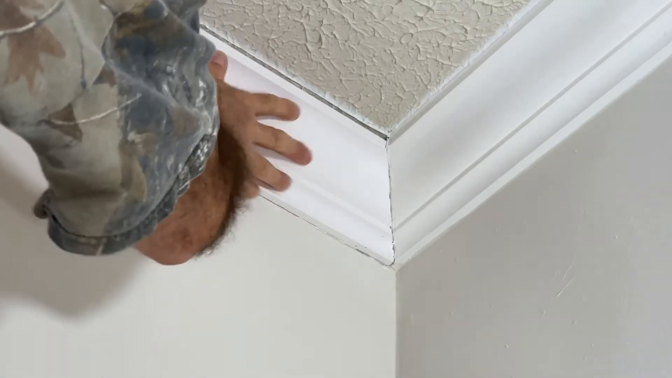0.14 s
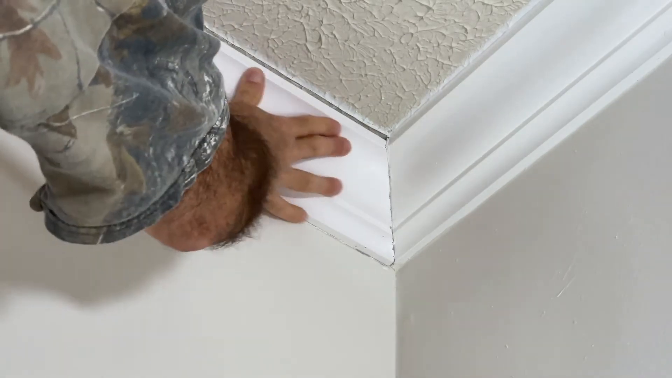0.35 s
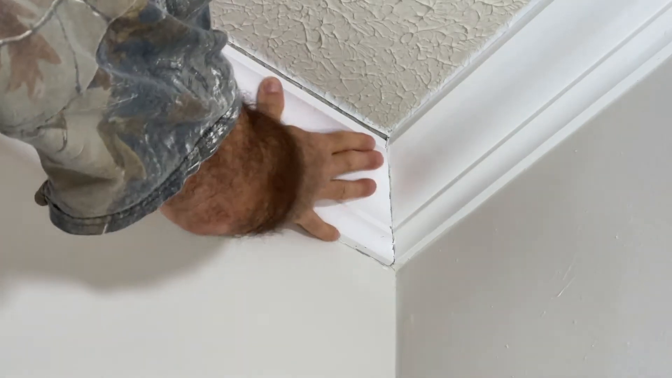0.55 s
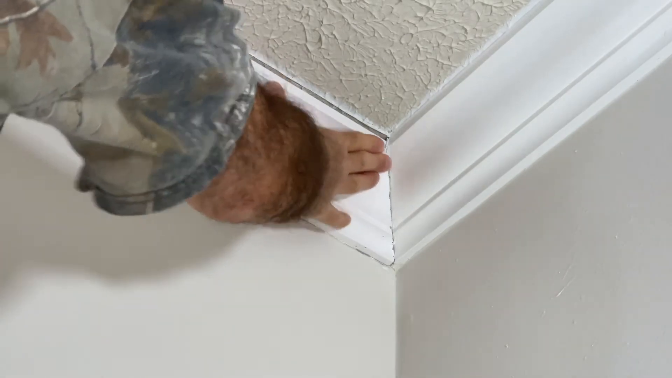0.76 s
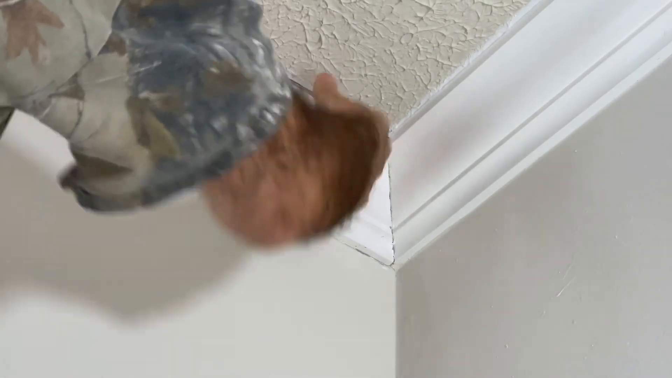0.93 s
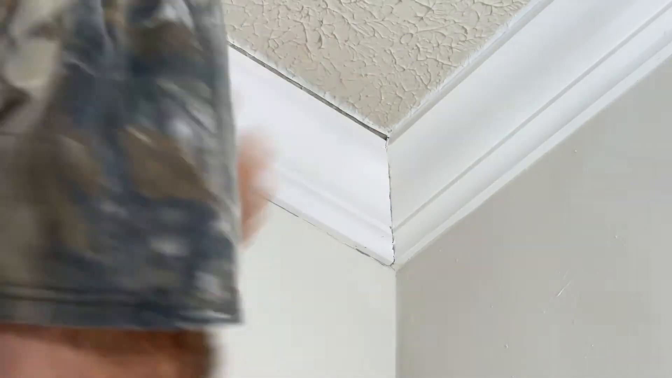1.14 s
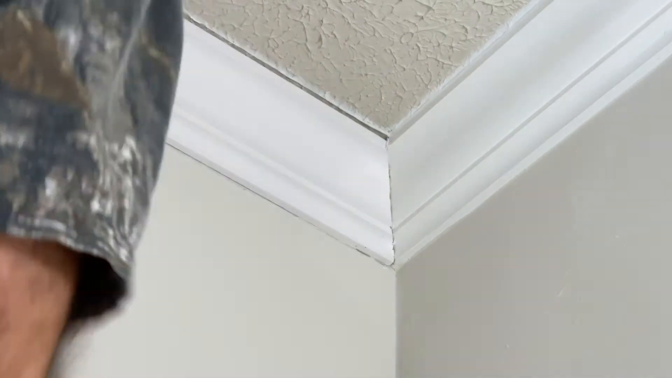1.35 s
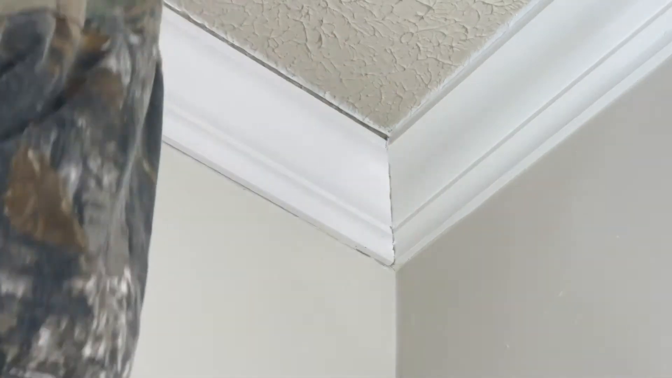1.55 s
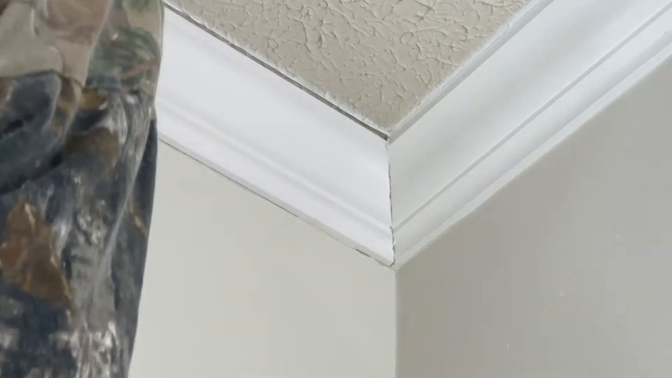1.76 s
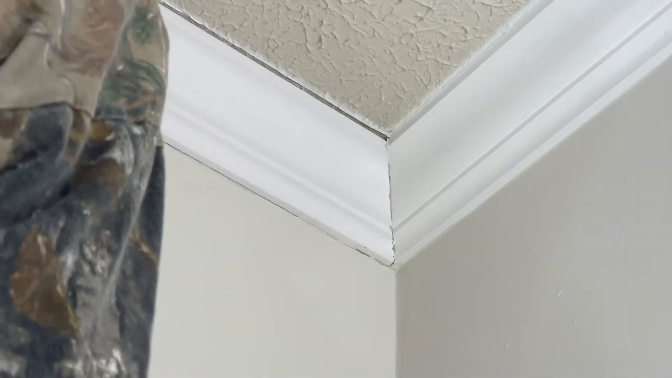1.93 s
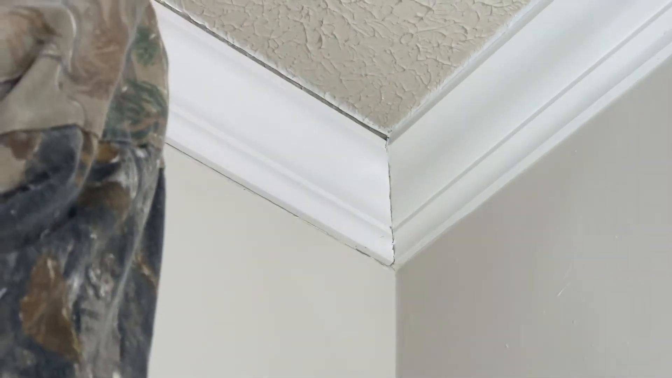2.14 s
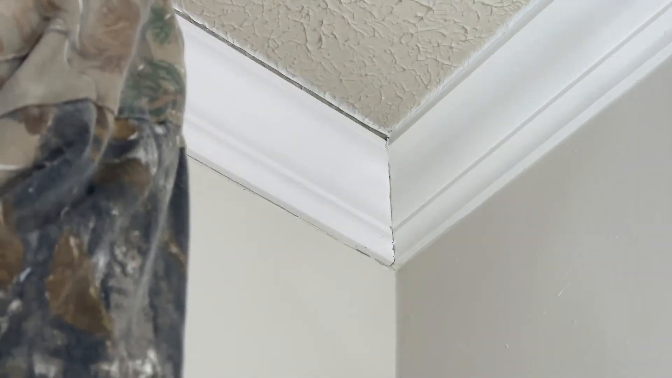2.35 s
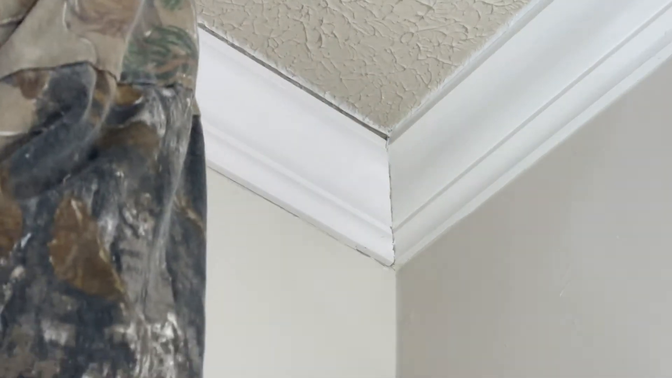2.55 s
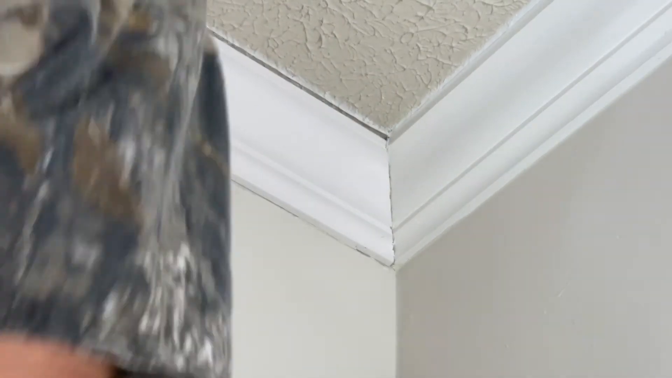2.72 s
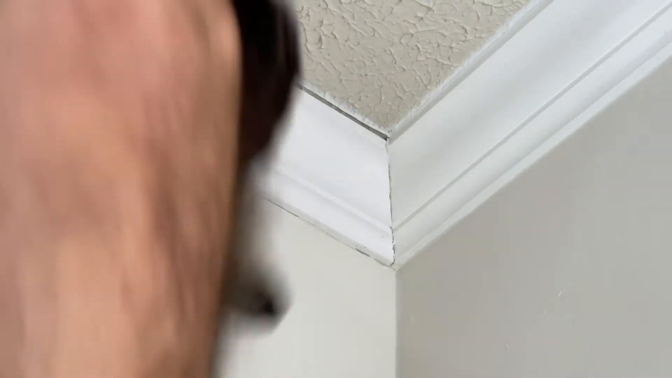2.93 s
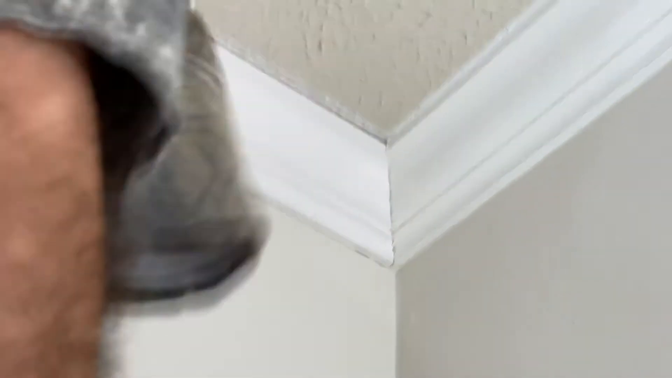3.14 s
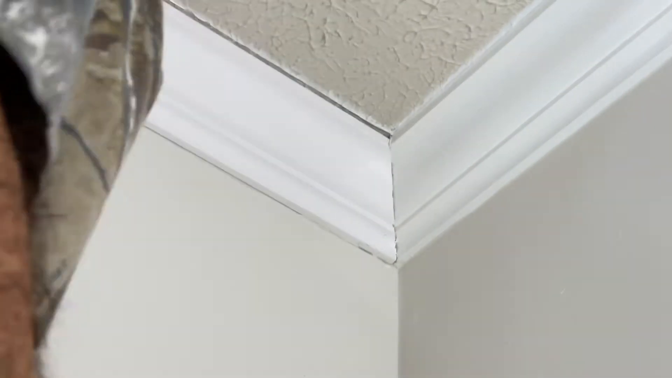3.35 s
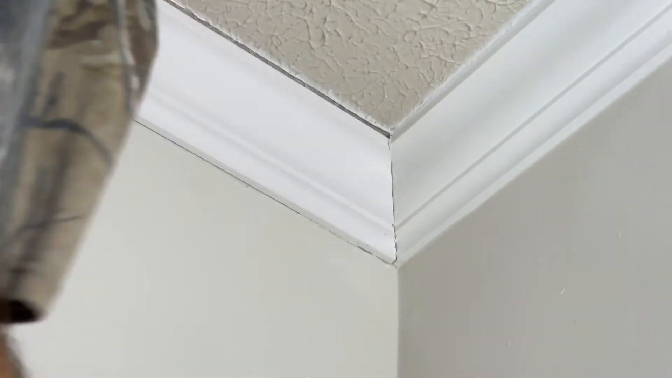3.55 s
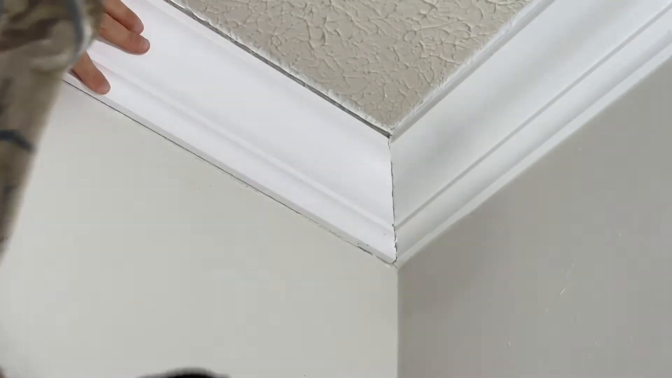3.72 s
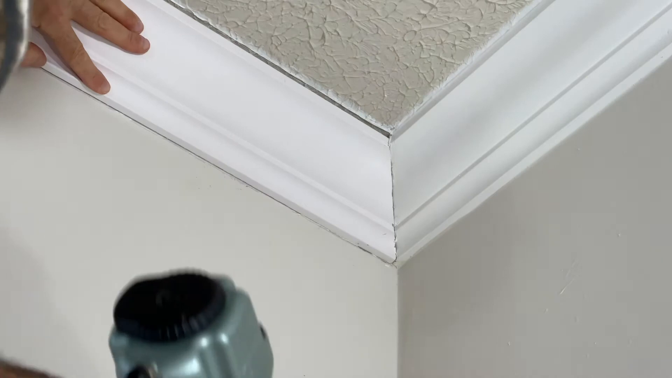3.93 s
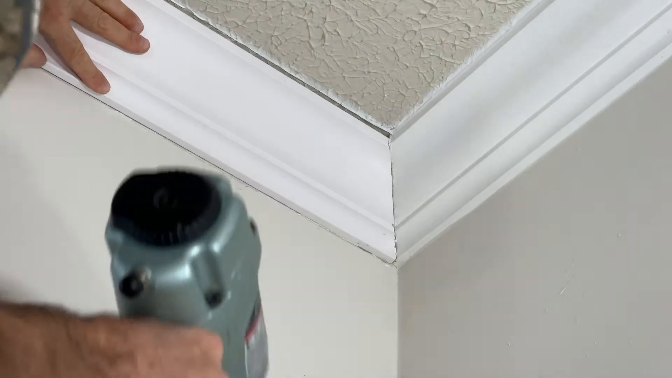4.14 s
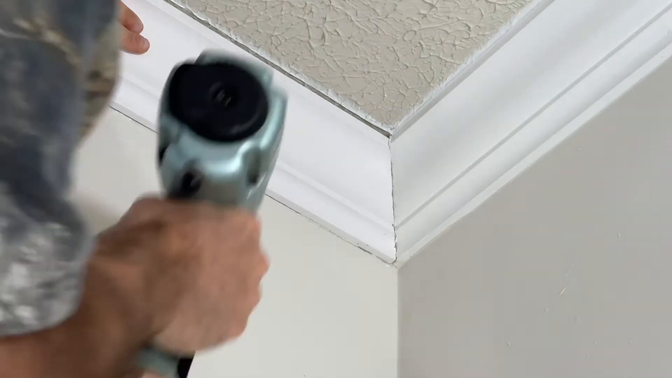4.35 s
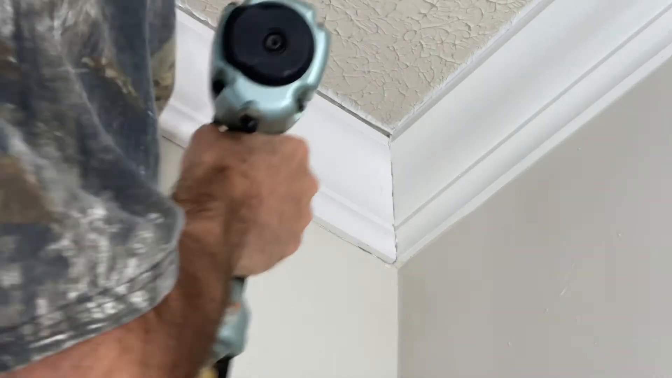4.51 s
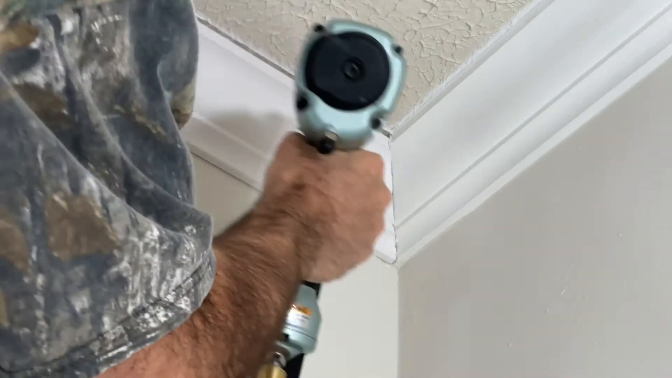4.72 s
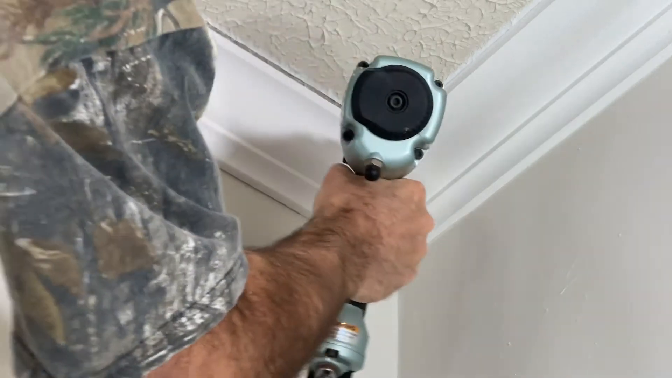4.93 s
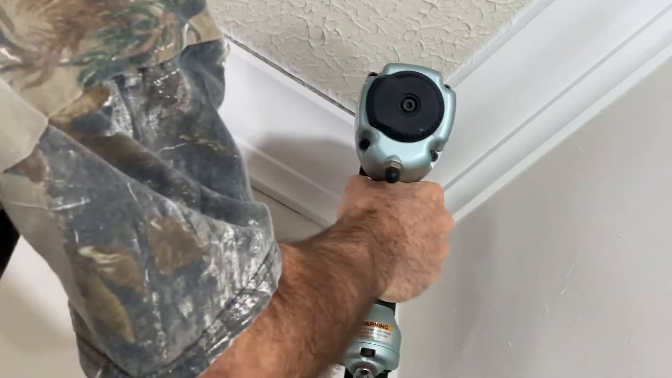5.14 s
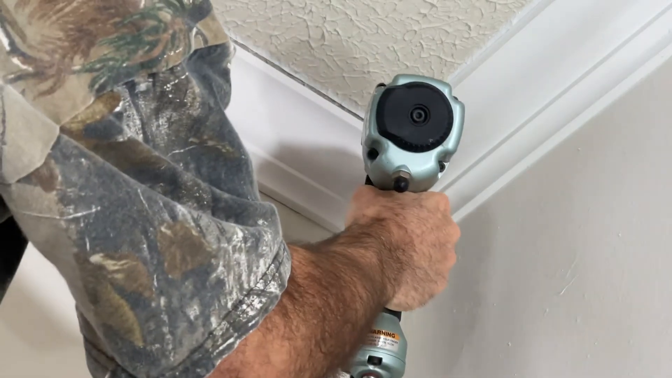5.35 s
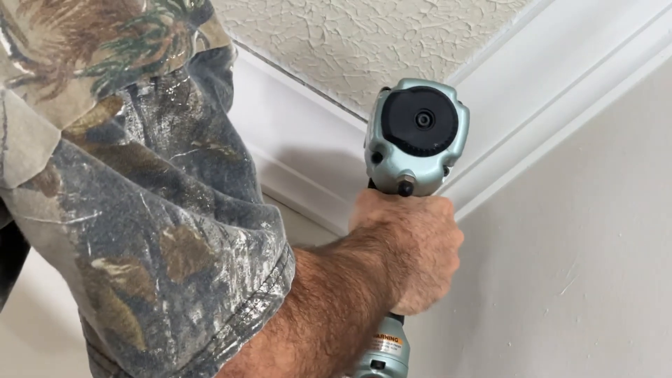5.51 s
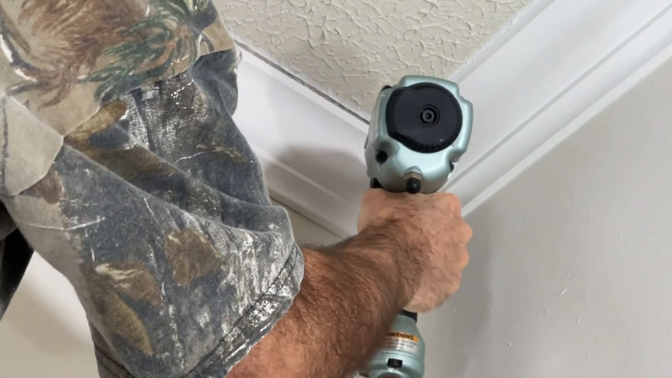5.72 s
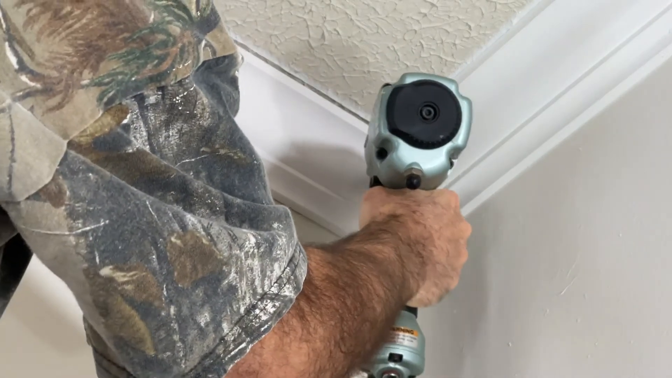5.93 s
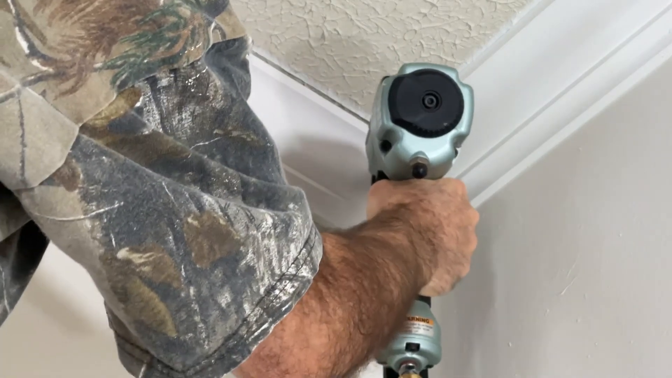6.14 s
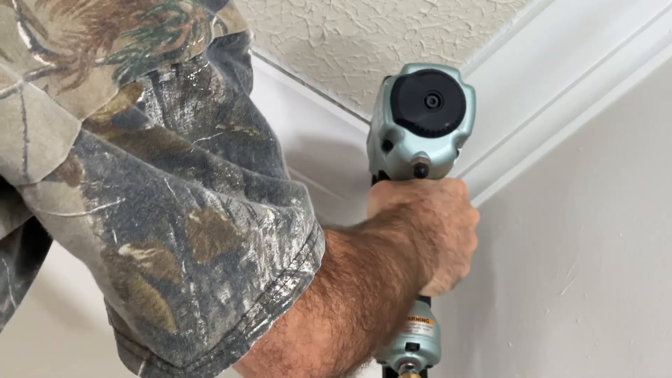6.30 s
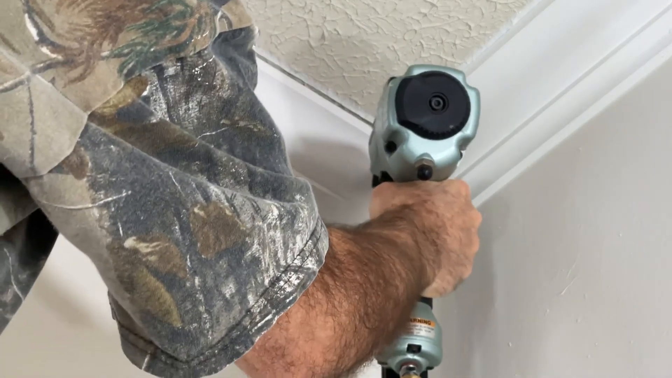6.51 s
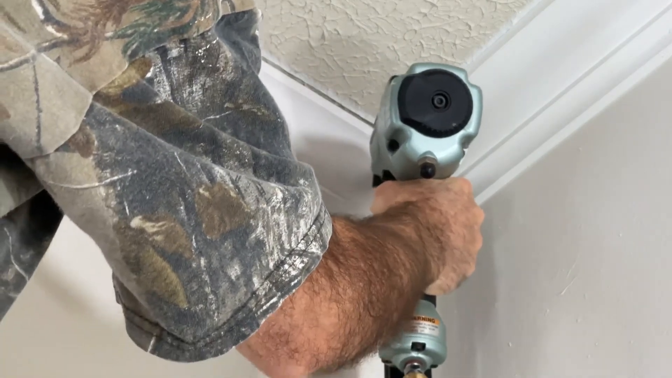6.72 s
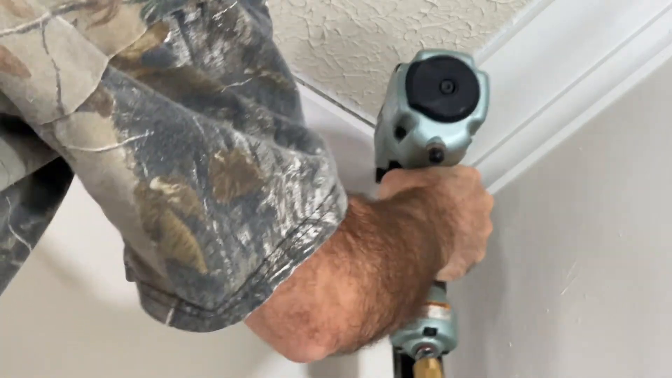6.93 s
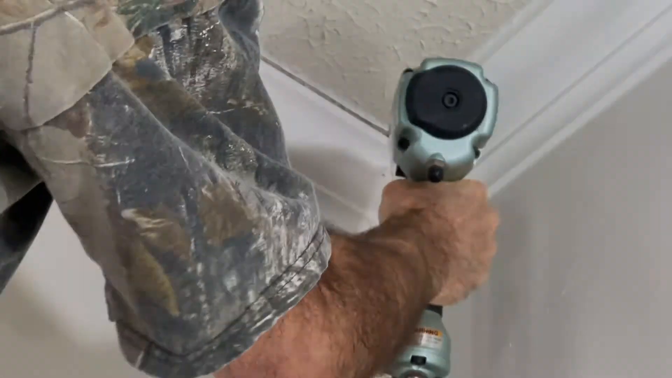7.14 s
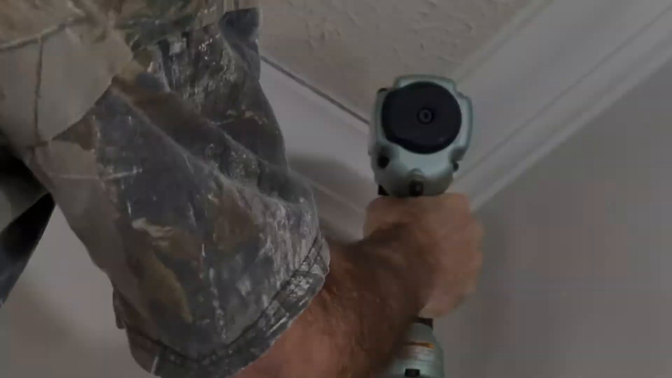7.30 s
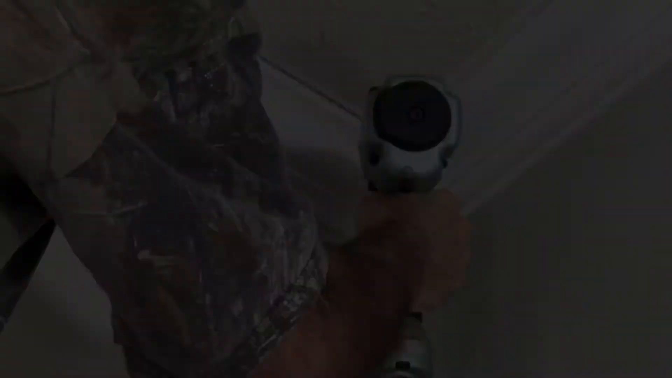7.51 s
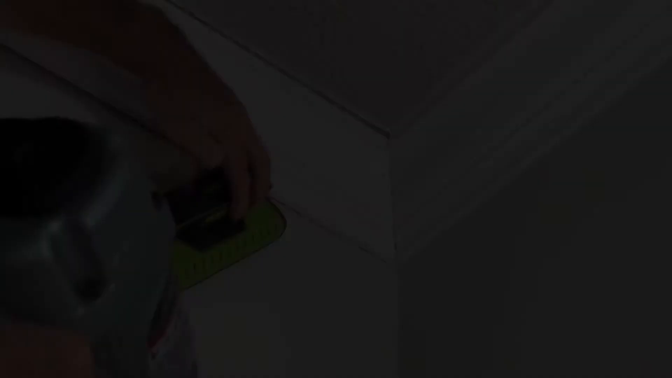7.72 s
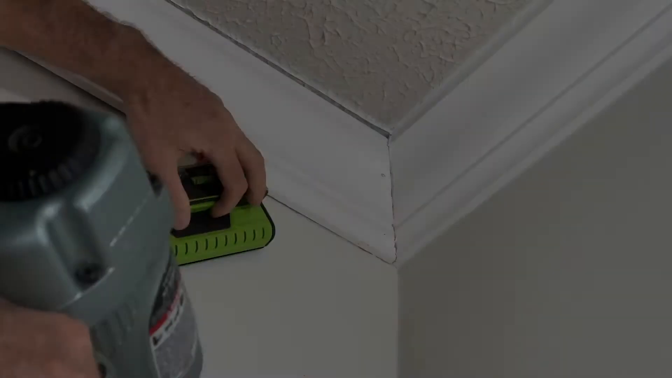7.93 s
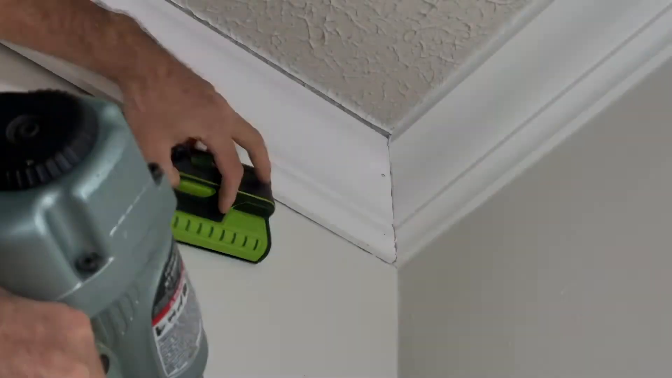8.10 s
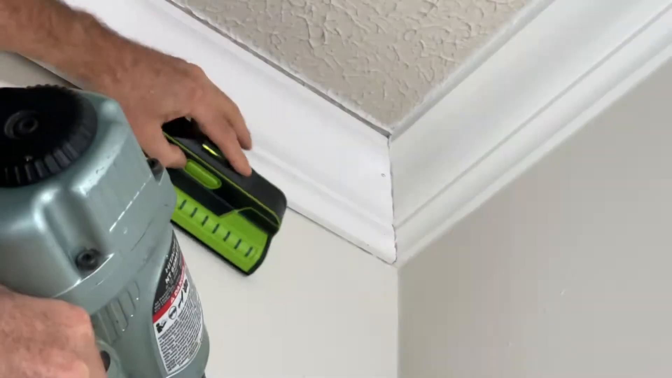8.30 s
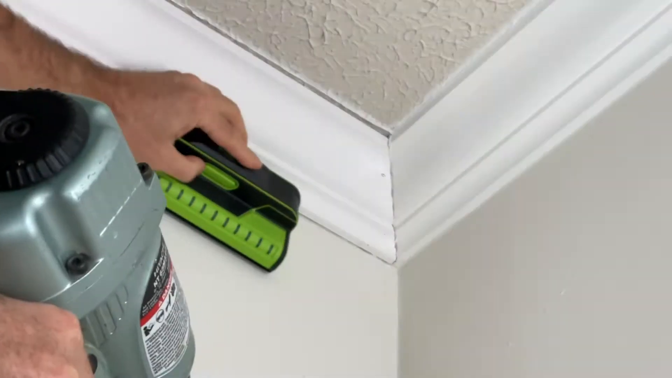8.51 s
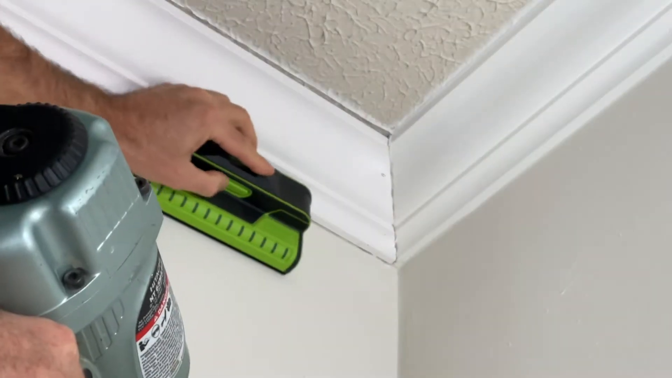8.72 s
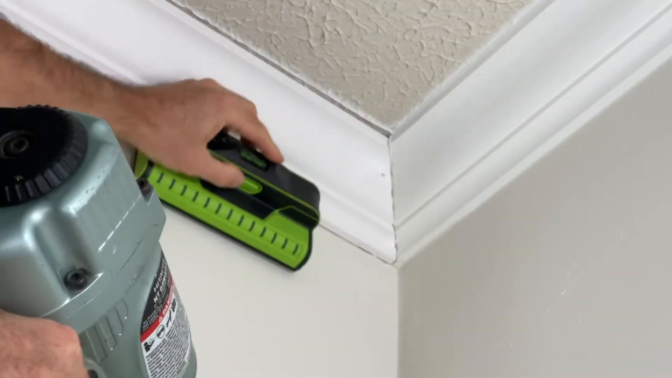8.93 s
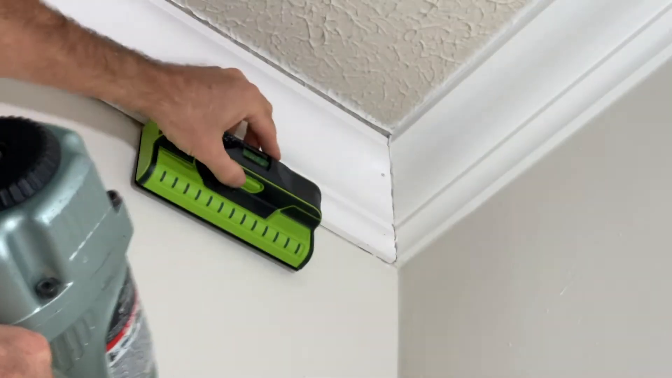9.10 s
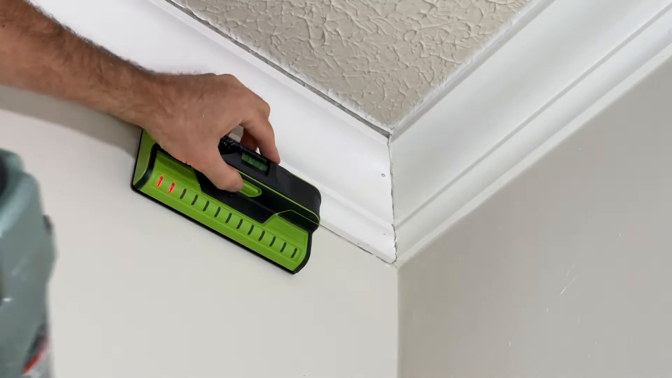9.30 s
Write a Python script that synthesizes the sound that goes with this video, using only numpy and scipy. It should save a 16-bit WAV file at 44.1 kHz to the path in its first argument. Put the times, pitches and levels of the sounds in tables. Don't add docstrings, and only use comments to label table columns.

```python
import sys
import numpy as np
from scipy import signal
from scipy.fft import rfft, irfft, next_fast_len
from scipy.io import wavfile
from scipy.ndimage import uniform_filter1d

SR = 44100
rng = np.random.default_rng(int(sys.argv[2]) if len(sys.argv) > 2 else 0)


def undo_db(level):
    steps = np.asarray(level, float) / 20
    return 10 ** steps


def master(y):
    cut = np.clip(np.atleast_2d(y).T, -1, 1)
    pcm = np.round(cut * 32767)
    wavfile.write(sys.argv[1], SR, pcm.astype(np.int16))


N = 412731
T = np.arange(N) / SR

# (time [s], level [dB], rise [s], t60 [s])
BLOWS = [
    (6.8135, -19, 0.00034, 0.086),
    (6.8212, -4.5, 0.00047, 0.011),
    (6.826, -29, 0.002, 0.12),
    (6.84, -9, 0.00022, 0.02),
    (6.8455, -13.5, 0.0004, 0.015),
    (6.85, -29, 0.0015, 0.31),
]
# (time [s], level [dB], rise [s], t60 [s])
PUFFS = [
    (6.9445, -26.5, 0.00065, 0.027),
    (6.955, -11.5, 0.0029, 0.12),
    (6.964, -21, .002, 0.04),
    (6.973, -21, 0.0029, 0.023),
    (6.983, -21, 0.0027, 0.077),
    (6.998, -32.5, 0.0024, 0.092),
]
# (time [s], level [dB])
BLEED = [
    (7.0, -46),
    (7.05, -45),
    (7.248, -47.5),
    (7.5, -90),
]
# (frequency [Hz], level [dB per Hz])
STEEL_COLOUR = [(180, -28.5), (450, -9.5), (790, -18.5), (1700, -13), (5930, -23.5), (9980, -16.5),
                (11600, -21), (16500, -55)]
# (frequency [Hz], width [Hz], level [dB])
VALVE_MODES = [(1950, 450, 10.5), (600, 400, -1), (3300, 350, -4.5), (5700, 600, -10)]
# (frequency [Hz], level [dB per Hz])
EXHAUST_COLOUR = [(59, -32.5), (100, 1), (1140, -21.5), (5100, -19.5), (10100, -6), (11200, -4),
                  (13600, -25.5), (16500, -41.5)]
# (frequency [Hz], width [Hz], level [dB])
CAP_MODES = [(5800, 110, -1), (7600, 29, -7), (8030, 37, -1), (8450, 30, 0.5), (8850, 150, -1),
             (11300, 210, 0)]
# (frequency [Hz], level [dB per Hz])
LEAK_COLOUR = [(710, -41), (1500, -24.5), (3500, -3.5), (4600, -0.5), (11100, 5), (13300, -21),
               (15000, -15), (16200, -31.5)]
# (frequency [Hz], width [Hz], level [dB])
NOZZLE_MODES = [(3500, 150, 1), (6890, 68, -1), (8430, 33, -10), (9600, 84, 5.5), (10850, 350, -3.5)]
# (frequency [Hz], level [dB per Hz])
BUFFET_COLOUR = [(20, -23.5), (35, -16), (55, 8.5), (80, -18.5), (150, -33.5)]

# (time [s], peak [dB], wood pitch [Hz], crack [dB], click [dB])
TAPS = [(.566, -35, 455, -14, -27), (1.769, -51, 597, -1.5, -2), (2.201, -45, 470, 2.5, -27),
        (2.652, -49, 467, 0.5, 13), (3, -24.5, 383, -5.5, -2), (3.077, -39, 585, -13, -20),
        (3.113, -29, 600, -18, -19), (3.135, -31, 633, -11.5, -3), (4.804, -41, 232, -2.5, -35),
        (5.31, -27.5, 470, -7, -9.5), (5.597, -42.5, 848, -1.5, -35), (5.865, -25.5, 867, -3.5, -4),
        (5.909, -40, 590, -26, -17), (6.23, -39.5, 263, -11, -15.5), (6.718, -43.5, 410, -5.5, -12.5),
        (8.958, -41.5, 569, 1, 6.5)]
# (time [s], peak [dB], wood pitch [Hz], crack [dB], click [dB])
PRESSES = [(.151, -39.5, 435, -45, -21), (.508, -31, 442, -19, -13), (.634, -36.5, 445, -33, -66),
           (2.875, -47.5, 432, -7, -31), (3.167, -38, 299, -27, 0), (3.461, -44, 263, -12, -50),
           (4.647, -48.5, 657, -8.5, -14), (5.023, -26.5, 437, -15.5, -55), (5.777, -40.5, 970, -2, -19),
           (5.799, -43.5, 450, -6, 4.5), (5.878, -21.5, 646, -2.5, -15), (5.885, -42.5, 600, -24, 10.5),
           (6.326, -45.5, 1048, 6, -3), (6.439, -50.5, 293, -15, -26), (6.498, -41, 308, -9.5, -40.5),
           (6.737, -35, 265, -13.5, -25.5), (8.301, -30.5, 408, -4, -8), (8.835, -33.5, 564, -23, -16),
           (8.975, -33, 568, -33, -35), (9.274, -34.5, 492, -7.5, -16.5)]
# (time [s], peak [dB], wood pitch [Hz], crack [dB], click [dB])
BUMPS = [
    (.525, -40, 452, -19, -26),
    (1.274, -48, 504, -29, -20),
    (3.217, -51, 404, 0, 4),
    (5.064, -40, 410, -12, -37),
    (7.702, -28, 566, -0.5, -10.5),
    (8.054, -31, 574, -7, -28),
    (8.069, -35, 392, -4.5, -4),
    (8.312, -31, 484, -20, -27),
    (8.656, -40.5, 253, -3.5, -12),
]
TAP_THUD_DB, PRESS_THUD_DB, BUMP_THUD_DB = -24.5, -9, 6.5
# (frequency [Hz], level [dB per Hz])
WOOD_COLOUR = [(250, 4.5), (450, 1.5), (650, -4.5), (900, 0.5), (1200, -17), (2000, -49.5)]
# (frequency [Hz], level [dB], t60 [s])
WALL_MODES = [(98, 0.5, 0.1), (78.45, -11, 0.29), (146.6, -7.5, 0.13), (212, -12.5, 0.077)]
# (frequency [Hz], level [dB per Hz])
CLICK_COLOUR = [(1650, -42), (2800, -5), (4870, -3.5), (6850, -4.5), (10200, -3.5), (11000, -4.5),
                (12700, -23.5), (13800, -48)]
# (frequency [Hz], width [Hz], level [dB])
CRACK_MODES = [(983, 260, 5), (1700, 444, 5), (2020, 230, 7), (3000, 2000, -2)]
# (frequency [Hz], width [Hz], level [dB])
MOULDING_MODES = [(389, 23, -7.5), (619, 61, 2.5), (1030, 18, -13), (1290, 16, -6), (1680, 90, -9.5),
                  (2450, 120, -17.5)]

# (time [s], peak [dB], frequency [Hz], t60 [s])
RINGS = [(3.004, -17.5, 564, 0.07), (3.005, -47.5, 1600, 0.49), (3.114, -34, 2320, 0.028),
         (3.134, -34, 671, 0.088), (3.75, -67.5, 1613, 1.11), (3.137, -35, 2556, 0.054),
         (3.169, -29, 8600, 0.03), (3.217, -23, 9700, 0.0079), (3.285, -44.5, 685, 0.065),
         (3.404, -39, 3050, 0.018), (4.803, -39.5, 800, 0.08), (5.028, -45.5, 474, 1.4),
         (5.3115, -18.5, 990, 0.024), (5.312, -36, 5700, 0.029), (5.799, -34, 9600, 0.028),
         (5.865, -16.5, 9970, 0.017), (5.88, -23.5, 9320, 0.058), (6.201, -31.5, 10300, 0.0094),
         (6.8213, -10.5, 2883, 0.027), (8.658, -29, 753, 0.028), (8.957, -25, 5580, 0.014),
         (3.018, -20, 520, 0.044), (3.087, -24, 600, 0.039), (3.24, -69, 1583, 0.57),
         (.527, -53, 1500, .06), (0.6, -50, 1290, .1), (.7, -61, 1700, 0.54), (7.92, -34, 100.8, 0.23),
         (8.066, -24, 99, 0.2), (8.156, -32, 98.7, 0.45), (5.337, -37.5, 980, .13),
         (6.815, -14.5, 580, .025), (6.8455, -11, 2900, .012), (6.8452, -12, 4500, .012),
         (5.029, -48, 2360, 0.024), (.2, -59.5, 820, 1), (0.19, -67, 1680, .8), (5.879, -22, 1700, .025),
         (5.9, -37, 620, 0.36), (5.866, -21, 1700, .025), (5.4, -42.5, 200, 0.091), (5.3, -49, 640, 0.19),
         (4.8, -63, 1550, 0.68), (6.806, -17, 1900, 0.027), (6.8125, -13, 2000, .03),
         (8.836, -35, 600, .05), (7.1, -23, 100, 0.22)]
# (time [s], peak [dB], frequency [Hz], t60 [s])
TICKS = [(3.168, -36, 3400, .02), (3.136, -35, 4000, .02), (3.217, -35, 3680, .012),
         (3.512, -53, 3500, .015), (5.561, -60, 7090, 0.022), (5.75, -44, 1301, 0.035),
         (5.81, -42.5, 2190, .012), (6.218, -56.5, 1990, .012), (6.7176, -43.5, 1096, .03),
         (8.658, -40, 1303, .02), (5.88, -28, 1240, 0.013), (5.929, -40, 4600, .01),
         (6.13, -63, 2500, .012), (6.158, -55, 4940, .012), (6.175, -51, 1700, 0.035),
         (6.544, -53, 1700, .015), (6.706, -50.5, 10680, 0.011), (7.892, -32.5, 1950, 0.034),
         (7.907, -39, 2082, 0.035), (7.998, -48, 1900, 0.024), (8.028, -37, 2020, 0.037),
         (8.125, -42, 1520, .02), (8.195, -55, 1900, 0.018), (8.309, -37.5, 1600, 0.017),
         (8.512, -46, 4800, 0.021), (8.59, -51.5, 3000, 0.022), (8.763, -53, 7550, 0.01),
         (8.777, -47.5, 7540, .015), (8.905, -45.5, 6500, .015), (8.957, -24.5, 3080, .018),
         (8.969, -38, 5050, 0.016), (9.2765, -42, 2815, 0.021), (9.2783, -37.5, 9560, 0.018)]

# (time [s], level [dB], rise [s], t60 [s])
PALM = [
    (.15, -52, 0.035, 1),
    (2.59, -39.5, 0.015, 0.17),
    (4.345, -56.5, 0.014, 0.64),
]
# (frequency [Hz], width [Hz], level [dB])
BOARD_MODES = [(278, 153, -2), (461, 79, 8), (870, 203, -7), (1080, 75, -7.5), (1700, 120, -18)]
RUB_START_S, RUB_MIDDLE_S, RUB_END_S, RUB_HALF_S = .665, .772, .88, .072
SLOWEST_HZ, FASTEST_HZ = 90, 284
RUB_DB, SPEED_DB, LIFT_S, LIFT_DB_PER_S = -43.5, 8, 0.845, -450

# (middle [s], half length [s], scrape [dB], hiss [dB])
SLIDES = [
    (7.88, 0.078, -60, -68),
    (8.1, 0.15, -57.5, -49.5),
    (8.2, 0.19, -49.5, -54.5),
    (8.57, 0.46, -57.5, -68),
    (8.86, 0.21, -61, -71),
    (9.05, 0.13, -62, -85),
]
# (time [s], level [dB], rise [s], t60 [s])
STROKES = [
    (7.846, -48, 0.0034, 0.183),
    (7.868, -39.5, 0.0099, 0.29),
    (7.893, -46.5, 0.0057, 0.24),
    (8.018, -33.5, 0.023, 0.175),
]
# (frequency [Hz], level [dB per Hz])
SCRAPE_COLOUR = [(90, -25), (150, -6), (450, -5), (900, -10), (1700, -10), (2500, -15), (4000, -24),
                 (7000, -45)]
# (frequency [Hz], width [Hz], level [dB])
CASE_MODES = [(586, 320, -2), (830, 22, -2.5), (1370, 27, -3), (1580, 64, -1), (2000, 69, -4.5),
              (2830, 30, -15)]

# (middle [s], half length [s], hands [dB], cloth [dB])
MOVES = [(.25, 0.37, -66, -60.5), (.55, 0.12, -51, -59), (.78, 0.16, -51.5, -61), (1.57, 0.18, -100, -65),
         (1.82, 0.18, -67.5, -67), (2.24, 0.43, -59, -60.5), (2.53, 0.22, -59.5, -55.5),
         (2.68, 0.26, -54, -66), (2.96, 0.15, -60, -61), (3.12, 0.13, -57, -57), (3.29, 0.059, -70, -63),
         (3.72, 0.4, -67.5, -67.5), (4.4, 0.29, -69.5, -83), (4.8, 0.29, -65, -68.5), (5.2, .14, -51, -72),
         (5.4, 0.33, -56.5, -85), (5.7, 0.14, -58, -73), (5.87, 0.14, -44, -73), (6.3, 0.43, -62.5, -82),
         (6.98, 0.16, -54, -45), (7.17, 0.085, -71, -50.5)]
# (time [s], level [dB])
STIR = [(0, -66), (1, -62.5), (1.45, -64.5), (2.24, -59.5), (2.6, -92), (2.84, -71), (3.35, -64),
        (3.52, -75), (3.7, -73), (4.05, -67.5), (4.93, -69.5), (5.6, -74.5), (6.27, -81.5), (6.8, -70),
        (7.75, -79.5), (8.4, -84), (9.1, -61), (9.36, -81)]
# (time [s], level [dB], rise [s], t60 [s])
SWISH = [
    (1.262, -50, 0.0063, 0.21),
    (2.64, -35, 0.0056, 0.046),
    (5.175, -49, 0.022, 0.36),
    (7.885, -47, 0.0087, 0.25),
    (8.02, -49.5, 0.0075, 0.3),
]
# (frequency [Hz], level [dB per Hz])
HANDLING_COLOUR = [(53, -32), (90, 4.5), (471, -3.5), (1300, -12.5), (1720, -14), (2500, -14.5),
                   (3250, -23.5), (5500, -120)]
# (frequency [Hz], level [dB per Hz])
CLOTH_COLOUR = [(880, -44), (1500, -13.5), (2200, -10), (4560, -11), (9020, -7), (10200, 0.5),
                (11300, -10.5), (13400, -63.5)]
HANDS_DB, FIBRES_DB, HUM_DB = -1, -2.5, -61.5

# (middle [s], half length [s], rumble [dB])
SHIFTS = [
    (.2, 0.26, -57),
    (2.1, 0.17, -63),
    (3.25, 0.21, -50),
    (5.21, 0.27, -50.5),
    (7.13, 0.061, -67.5),
    (7.95, 0.24, -63),
    (8.5, 0.87, -69),
    (9.33, 0.11, -57),
]
# (frequency [Hz], level [dB per Hz])
HUM_COLOUR = [(12, -62.5), (20, -21.5), (40, -15.5), (62, 6), (102, -17), (200, -11.5), (260, -34),
              (440, -120)]
# (frequency [Hz], level [dB per Hz])
SELF_COLOUR = [(30, -10.5), (300, -22.5), (400, -22), (600, -30), (5500, -44.5), (7000, -26.5), (8000, -42),
               (12000, -56.5)]
FADE_S, FADE_DB_PER_S, FADE_FLOOR_DB = 7.05, -63, -25.5
CUT_S = 7.7

# (frequency [Hz], t60 [s])
ROOM_DECAY = [(100, 0.28), (500, 0.41), (2000, 0.39), (6000, 0.23), (12000, 0.1)]
# (frequency [Hz], level [dB])
APART = [(30, -30), (80, -19), (250, -19), (900, -8), (2400, -14), (4500, -13), (6500, -30), (15000, -24)]
# (frequency [Hz], phase [rad])
LEAD = [(0, 0), (8100, 0.2), (8790, -0.2), (9390, -1.9), (11800, -6.2), (13200, -8.6), (15000, -11.8),
        (16400, -12.5)]


def unit(x):
    return x / np.sqrt(np.mean(x ** 2) + 1e-20)


def along(points, hz):
    f, v = np.transpose(points)
    return np.interp(np.log(hz + 1), np.log(f + 1), v)


def levels(rows):
    s, *cols = np.transpose(rows)
    return [undo_db(np.interp(T, s, c, -150, -150)) for c in cols]


def bursts(rows):
    start, db, rise, t60 = np.array(rows).T[:, :, None]
    t = np.maximum(T - start, 0)
    return np.sum(undo_db(db - 60 * t / np.abs(t60)) * (1 - np.exp(-t / np.abs(rise))), axis=0)


def swells(rows):
    middle, half, *cols = np.array(rows).T[:, :, None]
    shape = np.cos(np.pi / 2 * np.clip((T - middle) / np.abs(half), -1, 1)) ** 2
    return [np.sum(undo_db(db) * shape, axis=0) for db in cols]


def filtered(x, response):
    m = next_fast_len(N + SR // 2)
    return irfft(rfft(x, m) * response(np.fft.rfftfreq(m, 1 / SR)), m)[..., :N]


def resonances(modes):
    def response(f):
        total = 0
        for k, (centre, width, db) in enumerate(modes):
            damping = 1j * f * width
            total = total + (-1) ** k * undo_db(db) * damping / (centre * centre - f * f + damping)
        return total
    return response


def voiced(x, modes, share_db):
    return unit(x + undo_db(share_db) * unit(filtered(x, resonances(modes))))


def noise(spectrum, patchy_db=0):
    z = signal.stft(rng.standard_normal(N), nperseg=512)[2]
    field = uniform_filter1d(uniform_filter1d(rng.standard_normal(z.shape), 6, 0), 8, 1)
    x = signal.istft(z * undo_db(patchy_db * unit(field)), nperseg=512)[1][:N]
    return unit(filtered(x, lambda hz: undo_db(along(spectrum, hz))))


def rough_ring(t, hz, spread):
    size = max(int(SR / (hz * abs(spread))), 1)
    wander = rng.standard_normal((2, SR // 2))
    for _ in range(2):
        wander = uniform_filter1d(wander, size, axis=1, mode="wrap")
    strength, sideways = wander[:, :len(t)] * np.sqrt(1.5 * size)
    turn = 2 * np.pi * hz * t
    return ((0.73 + .6 * strength) * np.sin(turn) + 0.76 * sideways * np.cos(turn)) * 1.1


def valve():
    filling = np.clip((T - 6.8015) / .013, 0, 1) * undo_db(-60 * np.maximum(T - 6.819, 0) / .02)
    chamber = filtered(rng.standard_normal(N), lambda f: resonances(VALVE_MODES)(f) ** 2)
    return undo_db(-21.5) * filling * unit(chamber)


def struck_tone(start_s, db, hz, t60, rise_s):
    t = np.maximum(T - start_s, 0)
    return undo_db(db - 60 * t / t60) * np.sin(2 * np.pi * hz * t) * (1 - np.exp(-t / rise_s))


def driver():
    t = np.maximum(T - 6.8229, 0)
    falling = np.sin(np.pi * np.log2(1 + t / 0.0012))
    thump = -undo_db(-6 - 60 * t / 0.068) * falling * (1 - np.exp(-t / 0.00013))
    boom = struck_tone(6.8229, -29.0, 62, 0.4, 0.0092)
    clang = -struck_tone(6.8398, -7.0, 1230, 0.025, 0.00026)
    recoil = struck_tone(6.957, -18.0, 116, 0.059, 0.0021)
    return thump + boom + clang + recoil + bursts(BLOWS) * noise(STEEL_COLOUR)


def exhaust():
    bleed = levels(BLEED)[0]
    puffs = bursts(PUFFS) * voiced(noise(EXHAUST_COLOUR), CAP_MODES, share_db=-4)
    leak = bleed * voiced(noise(LEAK_COLOUR), NOZZLE_MODES, share_db=-6.5)
    return puffs + leak + undo_db(-4.5) * bleed * noise(BUFFET_COLOUR)


def nailer():
    return valve() + driver() + exhaust()


def wall_thud(t):
    thud = np.zeros(len(t))
    for hz, db, t60 in WALL_MODES:
        louder, sharper = rng.standard_normal(2)
        thud += undo_db(db + louder - 60 * t / t60) * np.sin(2 * np.pi * hz * (1 + 0.0085 * sharper) * t)
    return thud


def knocks():
    tones, shapes = np.zeros(N + SR), np.zeros((3, N + SR))
    t = np.arange(SR // 3) / SR
    swing = (1 - np.exp(-t / .003)) ** 2
    kinds = [(TAPS, TAP_THUD_DB), (PRESSES, PRESS_THUD_DB), (BUMPS, BUMP_THUD_DB)]
    contacts = [(*row, thud_db) for rows, thud_db in kinds for row in rows]
    for s, db, hz, crack_db, click_db, thud_db in contacts:
        at = round(s * SR)
        rise = (1 - np.exp(-t / (0.00033 * undo_db(-.4 * click_db)))) ** 2
        wood = undo_db(-3.5 - 60 * t * hz / 34) * np.sin(2 * np.pi * hz * t)
        wood += undo_db(-12.5 - 60 * t / 0.16) * rough_ring(t, hz, spread=.9)
        tones[at:][:len(t)] += undo_db(db) * wood * rise + undo_db(db + thud_db + 1.5) * wall_thud(t) * swing
        body = undo_db(db - 7.0 - 60 * t / 0.11)
        crack = undo_db(db + crack_db - 1.0) * (undo_db(-60 * t / 0.028) + undo_db(-8.5 - 60 * t / 0.16))
        click = undo_db(db + click_db - 2.0) * (undo_db(-60 * t / .024) + undo_db(-14.0 - 60 * t / 0.27))
        shapes[:, at:][:, :len(t)] += rise * [body, crack, click]
    body, crack, click = shapes[:, :N]
    rough_wood = voiced(noise(WOOD_COLOUR), MOULDING_MODES, share_db=-1)
    shell = unit(filtered(rng.standard_normal(N), lambda f: resonances(CRACK_MODES)(f) ** 2))
    return tones[:N] + body * rough_wood + crack * shell + click * noise(CLICK_COLOUR)


def rings():
    out = np.zeros(N + SR)
    parts = [(*row, .4 if row[2] > 2200 else .1) for row in RINGS]
    parts += [(*row, .9) for row in TICKS]
    for s, db, hz, t60, spread in parts:
        t = np.arange(min(int(abs(t60) * SR) + 200, SR // 2)) / SR
        envelope = undo_db(db - 1.5 - 60 * t / abs(t60)) * (1 - np.exp(-t * hz / 2)) ** 2
        out[round(s * SR):][:len(t)] += envelope * rough_ring(t, hz, spread)
    return out[:N]


def fingertip():
    speed = np.exp(-np.abs((T - RUB_MIDDLE_S) / RUB_HALF_S) ** 2.6)
    turns = np.cumsum(SLOWEST_HZ + (FASTEST_HZ - SLOWEST_HZ) * speed) / SR
    slips = np.diff(np.floor(turns), prepend=0) * undo_db(1.0 * rng.standard_normal(N))
    inside = (T > RUB_START_S) & (T < RUB_END_S)
    ring = filtered(slips * inside, resonances(BOARD_MODES))
    level = undo_db(RUB_DB + SPEED_DB * (speed - 1) + LIFT_DB_PER_S * np.maximum(T - LIFT_S, 0))
    return level * ring / np.std(ring[inside])


def palm():
    friction = filtered(rng.standard_normal(N), lambda f: resonances(BOARD_MODES)(f) * f ** 0.84)
    return bursts(PALM) * unit(friction)


def sliding_tool():
    scrape = swells(SLIDES)[0] + bursts(STROKES)
    grit = undo_db(2.6 * unit(uniform_filter1d(rng.standard_normal(N), 70)))
    case = voiced(grit * noise(SCRAPE_COLOUR, patchy_db=2.5), CASE_MODES, share_db=-9)
    wall_hum = unit(filtered(rng.standard_normal(N), resonances([(105.0, 26, 0)])))
    return scrape * (case + wall_hum)


def bed_fade():
    sinking = undo_db(np.clip(FADE_DB_PER_S * (T - FADE_S), FADE_FLOOR_DB, 0))
    return np.where(T < CUT_S, sinking, 1)


def hands_and_cloth():
    stir = bed_fade() * levels(STIR)[0]
    handling, cloth = swells(MOVES)
    wooden = voiced(noise(HANDLING_COLOUR, patchy_db=2.5), MOULDING_MODES, share_db=-6.5)
    hands = (handling + undo_db(HANDS_DB) * stir) * wooden
    grains = undo_db(1.4 * unit(uniform_filter1d(rng.standard_normal(N), 90)))
    fibres = unit(grains * noise(CLOTH_COLOUR, patchy_db=-2.5))
    rustle = cloth + undo_db(FIBRES_DB) * stir + swells(SLIDES)[1] + bursts(SWISH)
    return hands + rustle * fibres


def background():
    hum = bed_fade() * undo_db(HUM_DB) + swells(SHIFTS)[0]
    return hum * noise(HUM_COLOUR, patchy_db=4.5) + undo_db(-81.0) * noise(SELF_COLOUR)


def room(x):
    hz, _, z = signal.stft(np.pad(x, (520, 0))[:N], SR, nperseg=768)
    keep = undo_db(-120 * 384 / SR / np.abs(along(ROOM_DECAY, hz)))
    energy = np.array([signal.lfilter([1 - k], [1, -k], np.abs(row) ** 2) for k, row in zip(keep, z)])
    fresh = signal.stft(rng.standard_normal(N), nperseg=768)[2]
    return signal.istft(np.sqrt(energy) * fresh / np.std(fresh), nperseg=768)[1][:N]


def scene():
    near = knocks() + rings() + palm() + fingertip()
    shot = nailer()
    echoes = undo_db(-9) * room(near) + undo_db(-17.5) * room(shot)
    whole = near + shot + echoes + sliding_tool() + hands_and_cloth() + background()
    z = signal.stft(whole, nperseg=256)[2]
    other = signal.istft(z * np.exp(2j * np.pi * rng.random(z.shape)), nperseg=256)[1][:N]
    other = filtered(other, lambda hz: undo_db(along(APART, hz) + 5.0))
    return np.array([whole + other, whole - other]) * undo_db([[-.2], [.2]])


def treble_gate(x):
    hz, _, z = signal.stft(x, SR, nperseg=512)
    strength = uniform_filter1d(np.abs(z).mean(axis=0), size=7, axis=0)
    strength = uniform_filter1d(strength, size=5, axis=1)
    needed_db = np.where((hz > 14300) & (hz < 15800), -94, -80)[:, None]
    passes = (hz[:, None] < 13100) | (strength > undo_db(needed_db)) & (hz[:, None] < 16700)
    return signal.istft(z * passes, nperseg=512)[1][:, :N]


def top_cut(x):
    return signal.sosfilt(signal.butter(12, 16810, fs=SR, output="sos"), x)


def record(dry):
    ports = filtered(dry, lambda hz: np.exp(.5j * np.outer([1, -1], along(LEAD, hz))))
    held = ports / (1 + np.abs(ports / .95) ** 4) ** .25
    mix = treble_gate(held)
    return top_cut(mix)


dry = scene()
out = record(dry)
master(out)
```